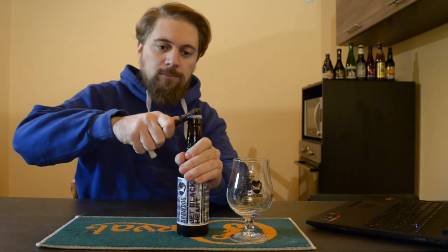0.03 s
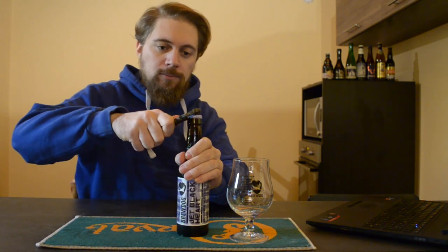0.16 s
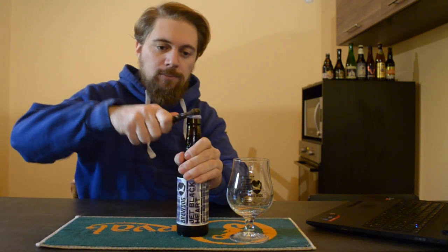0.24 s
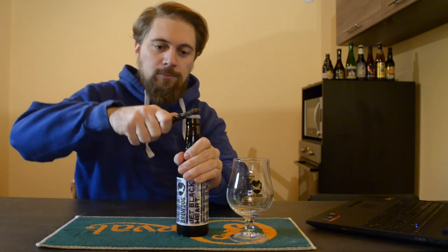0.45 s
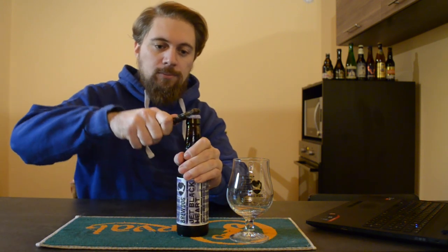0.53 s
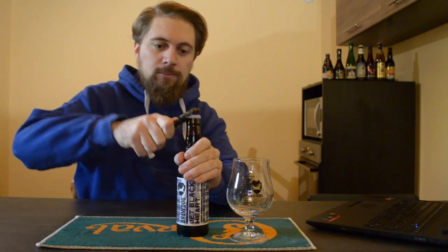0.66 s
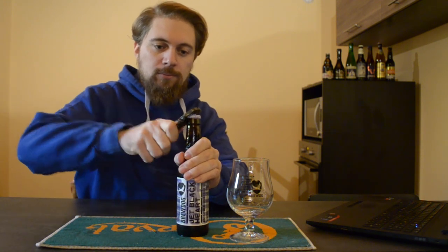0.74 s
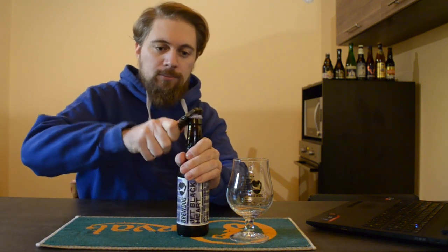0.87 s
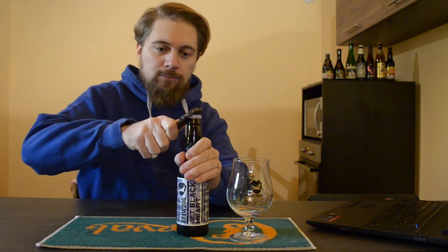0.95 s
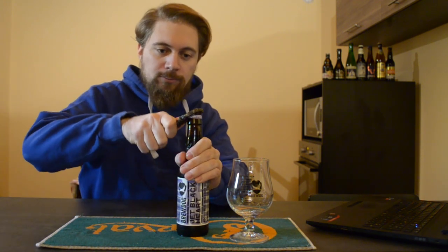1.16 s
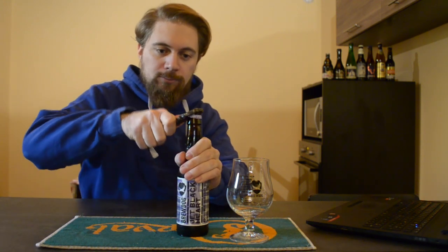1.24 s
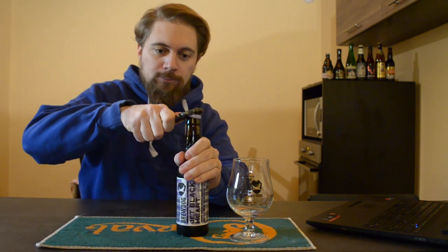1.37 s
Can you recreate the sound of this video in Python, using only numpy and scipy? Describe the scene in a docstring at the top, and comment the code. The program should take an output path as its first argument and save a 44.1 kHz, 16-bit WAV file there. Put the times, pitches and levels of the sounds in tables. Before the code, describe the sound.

A metal opener prises the cap off a glass beer bottle: a loud pop and short gas hiss, then a sharp metallic clack. The bottle knocks dully on the table, close to the microphone in a small, hard room.

```python
"""A metal opener levers the crown cap off a glass beer bottle on a table in a small, hard room.
The rim ticks, and the cap gives with a loud pop and a short hiss of gas; half a second later the opener
slips, then snaps it clear with a metallic clack. Under the strain the hands rub faintly and the bottle
knocks dully on the table. Each blow is a burst of contact noise plus the damped modes of the struck body,
prolonged by the room's reverberation. The pop and the clack overload the microphone."""
import sys
import numpy as np
from scipy import signal
from scipy.fft import rfft, irfft
from scipy.io import wavfile

SR = 44100
rng = np.random.default_rng(int(sys.argv[2]) if len(sys.argv) > 2 else 0)


def wav_out(sig):
    """Save sig, one row per channel (or a flat mono array), as 16-bit PCM at SR to the path in sys.argv[1]."""
    wavfile.write(sys.argv[1], SR, np.round(np.clip(np.atleast_2d(sig).T, -1, 1) * 32767).astype(np.int16))


N = 61739

# The cap giving way. Each row: start in seconds, level in dB.
POP_EVENTS = [(0.2432, 4)]


def amp(db):
    """Amplitude grows tenfold for every 20 dB."""
    return 10 ** (np.asarray(db) / 20)


def decay(t, t60):
    """Exponential damping: the amplitude falls 60 dB in t60 seconds."""
    return np.exp(-np.log(1000) * t / t60)


def curve_at(points, hz):
    """Interpolation of a curve on a logarithmic frequency axis."""
    frequencies, values = np.transpose(points)
    return np.interp(np.log(hz + 1), np.log(frequencies), values)


def add(mix, start_s, sound):
    """Superposition: a sound adds to the mix from its start time."""
    part = mix[..., max(round(start_s * SR), 0):][..., :sound.shape[-1]]
    part += sound[..., :part.shape[-1]]


def noise(spectrum, size):
    """Sinusoids of random phase sum to noise of the given spectral shape, scaled to unit RMS."""
    hz = np.fft.rfftfreq(size, 1 / SR)
    phases = np.exp(2j * np.pi * rng.random(len(hz)))
    x = irfft(amp(curve_at(spectrum, hz)) * phases, size)
    return x / x.std()


def tinted(x, spectrum):
    """A minimum-phase filter of unit energy shapes the spectrum without ringing ahead of the attack."""
    size = 4096
    log_gain = np.log(amp(curve_at(spectrum, abs(np.fft.fftfreq(size, 1 / SR)))))
    taps = np.fft.ifft(np.exp(np.conj(signal.hilbert(log_gain)))).real[:size // 2]
    return signal.fftconvolve(x, taps / np.linalg.norm(taps))[:len(x)]


def contact_noise(t):
    """A brief contact is broadband: noise with a flat spectrum and the energy of its envelope t."""
    x = rng.standard_normal(len(t)) * t
    for _ in range(8):  # flatten the spectrum, then confine the burst in time
        x = irfft(np.exp(1j * np.angle(rfft(x))), len(t)) * (t > .01)
    return x * np.linalg.norm(t) / np.linalg.norm(x)


def strike(modes, spectrum, burst_db, burst_t60, burst_send_db, pitch=1, contact_s=.00022):
    """An impact excites contact noise and damped modes. Returns the direct sound and the room send."""
    t = np.arange(8192) / SR
    attack = 1 - np.exp(-(t / contact_s) ** 2)
    burst = amp(burst_db) * tinted(contact_noise(decay(t, burst_t60)), spectrum)
    out = np.array([burst, amp(burst_send_db) * burst])
    for k, (frequency, db, t60, send_db) in enumerate(modes):
        ring = (-1) ** k * amp(db) * attack * decay(t, t60) * np.sin(2 * np.pi * frequency * pitch * t)
        out += [ring, amp(send_db) * ring]
    return out


def hits(events, modes, spectrum, **burst):
    """A linear body rings in the same modes at every blow, scaled by the blow's strength."""
    out = np.zeros((2, N))
    for start_s, db in events:
        add(out, start_s, amp(db) * strike(modes, spectrum, **burst))
    return out


def grip():
    """Friction of the hands taking up the strain makes a soft rubbing noise."""
    # Each row: time in seconds, level in dB.
    levels = [(0, -50.5), (.11, -52.5), (.22, -51), (.5, -43.5), (0.721, -63.5), (1.0, -62), (1.4, -64.5)]
    # Each row: frequency in Hz, relative spectral density in dB.
    spectrum = [(30, -13.5), (80, -9.5), (115, 20), (150, -4), (300, -1.5), (800, -4), (1600, -17),
                (3300, -17.5), (6000, -33.5), (15000, -42.5)]
    return amp(np.interp(np.arange(N) / SR, *np.transpose(levels))) * noise(spectrum, N)


def background():
    """Stationary noise, strongest in the bass, forms the room's noise floor."""
    # Each row: frequency in Hz, relative spectral density in dB.
    spectrum = [(20, -6), (40, -21.5), (60, 11.5), (80, -22), (120, -4.5), (240, -0.5), (400, -7.5),
                (800, -11), (1500, -17.5), (3000, -26.5), (6000, -35), (15000, -37.5)]
    return amp(-53) * noise(spectrum, N)


def table_knocks():
    """The bottle rocks against the table through a mat; the long, soft contact gives a dull attack."""
    # Each row: start in seconds, level in dB, pitch in Hz.
    knocks = [(0.19, -17, 232), (0.4893, -0.5, 222.7), (0.4936, 0, 227), (0.715, -3.5, 211),
              (0.7485, -4, 209.6), (0.7698, 2.5, 215), (0.783, 11.5, 221.2), (0.89, -9, 224),
              (1.2808, 1.5, 209.8)]
    # The table top. Each row: multiple of the pitch, level in dB, T60 in seconds, room send in dB.
    modes = [(1, -25.5, 0.081, -11.5), (1.4, -42.5, 0.093, 9.5), (1.95, -46.5, .04, 11),
             (3.9, -43.5, 0.09, 4.5)]
    # Each row: frequency in Hz, relative spectral density in dB.
    thud = [(30, -25.5), (90, -19), (180, -6.5), (500, 9.5), (900, -10.5), (1600, -9.5), (4000, -34.5),
            (15000, -63.5)]
    out = np.zeros((2, N))
    for start_s, db, hz in knocks:
        knock = strike(modes, thud, burst_db=-39, burst_t60=.06, burst_send_db=2, pitch=hz, contact_s=.002)
        add(out, start_s, amp(db) * knock)
    return out


def rim_ticks():
    """Small impacts of the opener set the cap's rim into brief free vibration."""
    # Each row: start in seconds, level in dB.
    ticks = [(0.2242, -4.5), (0.2273, 2)]
    # Each row: frequency in Hz, level in dB, T60 in seconds, room send in dB.
    modes = [(424, -26, .045, -2), (700, -34, 0.013, -25.5), (3070, -25, 0.024, 1.5),
             (5210, -39.5, 0.014, 2), (9100, -44, 0.0095, -19.5)]
    # Each row: frequency in Hz, relative spectral density in dB.
    crack = [(100, -15), (1000, 0), (5000, -3), (9000, -7), (14000, -8.5), (17000, -20)]
    return hits(ticks, modes, crack, burst_db=-20, burst_t60=.004, burst_send_db=0)


def cap_pop():
    """The cap's sudden release acts as an impulse, exciting heavily damped resonances."""
    # Each row: frequency in Hz, level in dB, T60 in seconds, room send in dB.
    modes = [(150.7, -21.5, 0.031, 8.5), (400, -25, 0.073, 5), (488, -17.5, 0.02, 3.5),
             (1001, -20, 0.035, 5.5), (1601, 2.5, .016, -5), (1810, 4, 0.0096, -5.5),
             (2118, -8.5, 0.016, 2.5), (3003, -10.5, 0.03, 0.5), (3413, -9, 0.025, 6),
             (4000, -15, .012, 2.5), (4590, -26.5, 0.024, -1), (5090, -20.5, 0.018, 7.5),
             (7500, -21.5, .015, -3), (9460, -20, 0.013, -7.5)]
    # Each row: frequency in Hz, relative spectral density in dB.
    crack = [(40, -19), (150, 1.5), (700, -5.5), (1700, 4), (2600, 1.5), (4500, -2.5), (6200, -15.5),
             (10500, -14.5), (15500, -23.5), (18000, -24)]
    return hits(POP_EVENTS, modes, crack, burst_db=-4, burst_t60=.009, burst_send_db=-2)


def gas_hiss():
    """Gas escapes under the cap once the seal breaks; its turbulent noise dies away with the flow."""
    # Each row: frequency in Hz, relative spectral density in dB.
    spectrum = [(100, -11.5), (500, 6.5), (800, -9.5), (1400, -9), (1750, 7.5), (2500, -8), (3400, 3.5),
                (4300, -8.5), (5200, -1), (6200, -12.5), (8600, -14.5), (9500, -15), (10500, -31),
                (15500, -37)]
    t, out = np.arange(N) / SR, np.zeros(N)
    rise_s = .01
    flow = (1 - np.exp(-t / rise_s)) * decay(t, t60=.65)
    add(out, POP_EVENTS[0][0], amp(-27.5) * flow * noise(spectrum, N))
    return out


def opener_slips():
    """Sliding friction: each slip of the opener on the cap gives a short scrape with faint ringing."""
    # Each row: start in seconds, level in dB.
    slips = [(0.7095, -32), (0.7168, 1), (0.7525, -0.5), (1.2815, -40), (1.3062, -17.5)]
    # Each row: frequency in Hz, level in dB, T60 in seconds, room send in dB.
    modes = [(1700, -42, .015, -6.5), (2780, -42, .018, 3), (3980, -42, .012, -8)]
    # Each row: frequency in Hz, relative spectral density in dB.
    scrape = [(100, -3), (1000, -1), (2500, -0.5), (4500, -1), (5400, -21), (15000, -44)]
    return hits(slips, modes, scrape, burst_db=-35.5, burst_t60=.023, burst_send_db=-1)


def opener_clack():
    """As the cap snaps clear, rapid impacts excite the inharmonic modes of opener and bottle neck."""
    # Each row: start in seconds, level in dB.
    clacks = [(0.7712, -28), (0.7762, -28.5), (0.7802, -0.5), (0.7832, -13.5)]
    # Each row: frequency in Hz, level in dB, T60 in seconds, room send in dB.
    modes = [(151, -19.5, 0.098, 1.5), (238, -9, 0.068, -9.5), (430, -10.5, 0.01, -1.5),
             (667.6, -12.5, 0.036, 0), (910, -11, 0.061, -2.5), (1295, -16, 0.018, 2),
             (1610, -29.5, 0.073, 4), (2181, -4.5, 0.024, 3.5), (2612, -12.5, 0.028, -2.5),
             (2863, -0.5, 0.02, -8), (3170, -16.5, 0.065, 1.5), (3703, -17.5, 0.041, -5.5),
             (4490, -12, 0.019, -2), (5350, -19, 0.024, -6.5), (6114, -12.5, 0.051, -11),
             (6780, -30, 0.037, -4.5), (8270, -27.5, 0.043, -8.5), (9020, -37, .025, -1)]
    # Each row: frequency in Hz, relative spectral density in dB.
    crack = [(40, -30), (200, -1.5), (900, -1), (1800, 3.5), (3000, 9), (4900, -9.5), (6200, -5),
             (7500, -30), (11000, -27.5), (15000, -35), (18000, -49.5)]
    return hits(clacks, modes, crack, burst_db=-3.5, burst_t60=.016, burst_send_db=-2)


def room_response():
    """A room's impulse response sums a diffuse tail, early reflections and low standing waves."""
    # Each row: frequency in Hz, T60 in seconds.
    reverb_times = [(60, 0.17), (130, 0.67), (260, 0.63), (700, 0.55), (1800, 0.59), (3300, 0.6),
                    (5000, .54), (9000, 0.38), (14000, .34)]
    # Reflections from table and walls. Each row: delay in seconds, gain in dB.
    echoes = [(.0028, -14), (.0124, -19.5), (.0155, -12), (.0192, -15), (.0212, -26)]
    # Each row: frequency in Hz, level in dB, T60 in seconds.
    standing_waves = [(119.2, -56, 1), (153.3, -56.5, 0.46)]
    # What the walls return. Each row: frequency in Hz, relative gain in dB.
    walls = [(30, -13), (80, -3), (125, -4), (170, -1.5), (220, 2), (400, -1.5), (2000, -0.5), (5000, -0.5),
             (9000, -5.5), (15000, -2.5)]
    band_hz, frame_s, bands = signal.stft(rng.standard_normal(SR), SR, nperseg=1024)
    fade = decay(frame_s, curve_at(reverb_times, band_hz)[:, None])
    # each band carries exactly the energy of its decay curve
    bands *= fade * np.sqrt((fade ** 2).sum(1) / (abs(bands * fade) ** 2).sum(1))[:, None]
    t = np.arange(SR) / SR
    onset_s, build_s = .0046, .0038
    response = signal.istft(bands, SR)[1][:SR] * np.clip((t - onset_s) / build_s, 0, 1)
    response /= np.linalg.norm(response)
    for delay_s, db in echoes:
        add(response, delay_s, amp([db]))
    for hz, db, t60 in standing_waves:
        response += amp(db) * decay(t, t60) * np.sin(2 * np.pi * hz * t)
    return amp(-4) * tinted(response, walls)


def scene():
    """The blows' direct and reverberant fields add to the hiss, the rubbing and the noise floor."""
    room = room_response()
    direct, sent = rim_ticks() + cap_pop() + opener_clack() + opener_slips() + table_knocks()
    reverberation = signal.fftconvolve(sent, room)[:N]
    return (direct + reverberation + gas_hiss() + grip() + background())[None]


def record(dry):
    """Saturation in the microphone flattens the loudest peaks; a low-pass filter limits the band."""
    knee, ceiling, cutoff_hz = 4.6, 1.02, 16000
    clipped = dry / (1 + abs(dry / ceiling) ** knee) ** (1 / knee)
    lowpass = signal.firwin(255, cutoff_hz, window=("kaiser", 8), fs=SR)
    return signal.oaconvolve(clipped, lowpass[None], "same")


dry = scene()
out = record(dry)
wav_out(out)
```